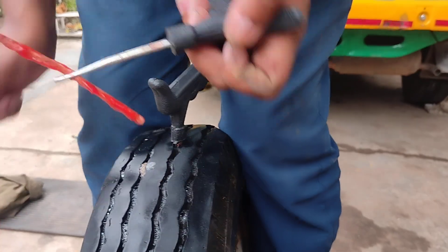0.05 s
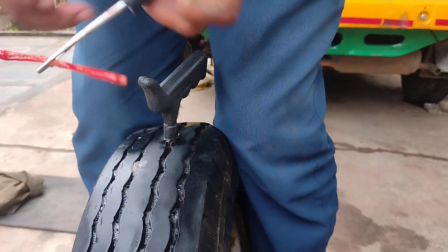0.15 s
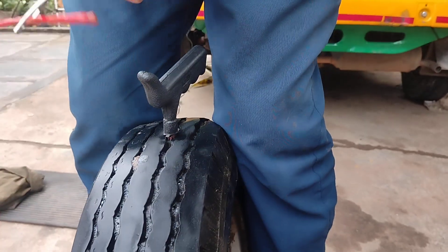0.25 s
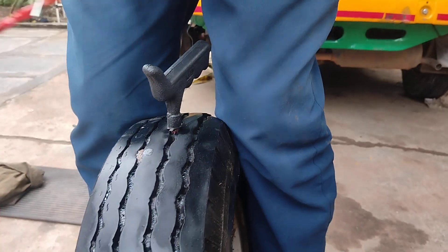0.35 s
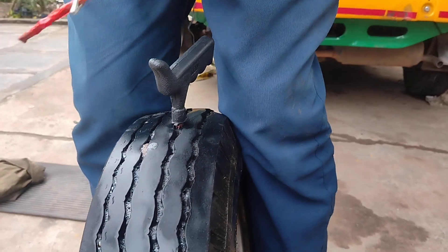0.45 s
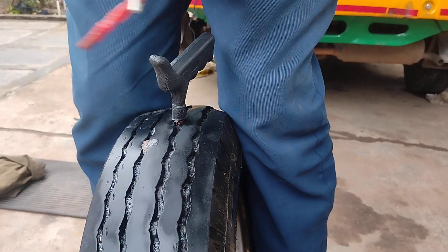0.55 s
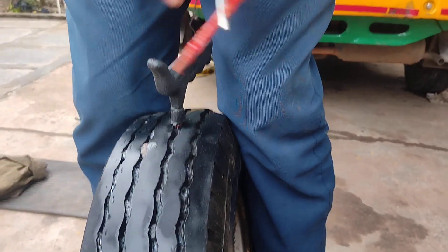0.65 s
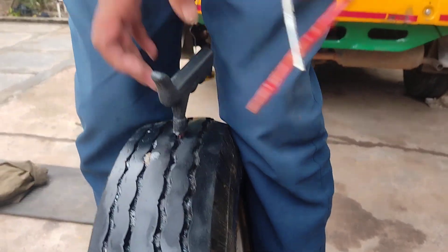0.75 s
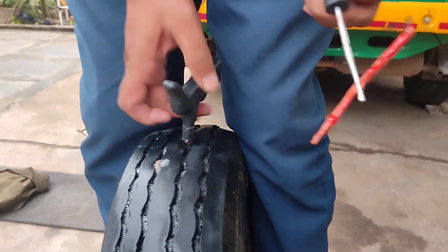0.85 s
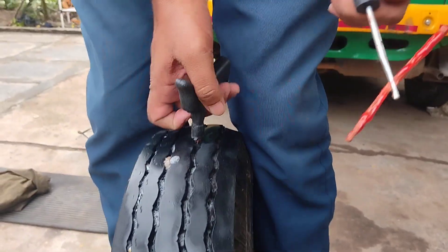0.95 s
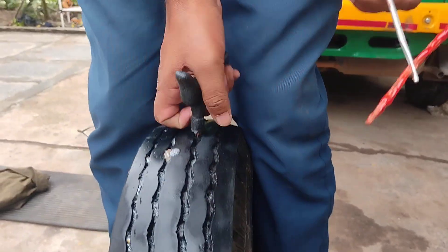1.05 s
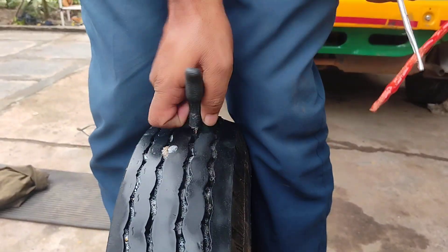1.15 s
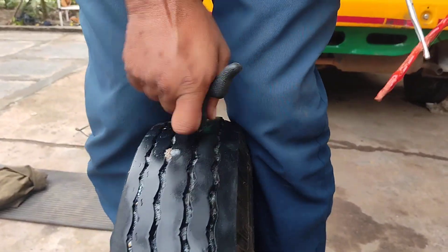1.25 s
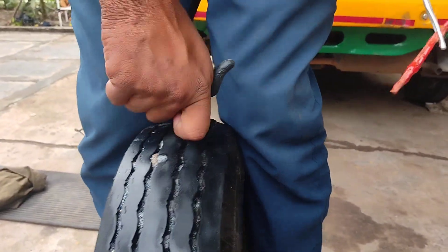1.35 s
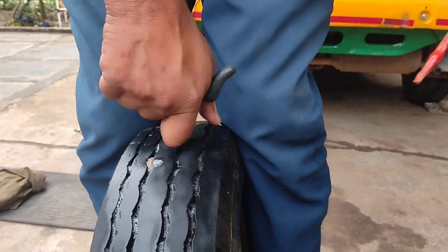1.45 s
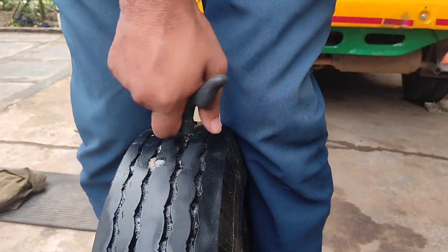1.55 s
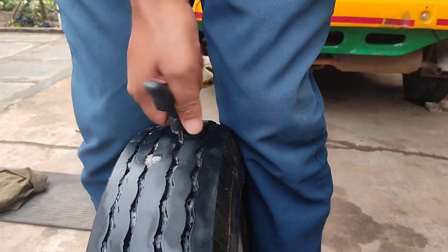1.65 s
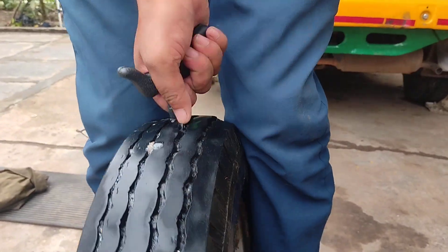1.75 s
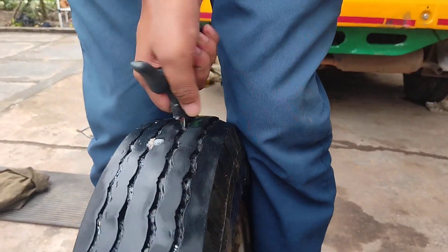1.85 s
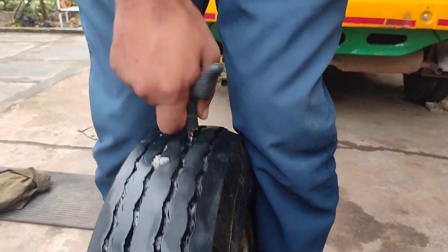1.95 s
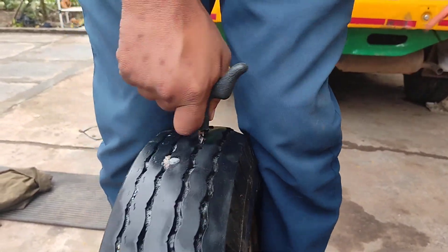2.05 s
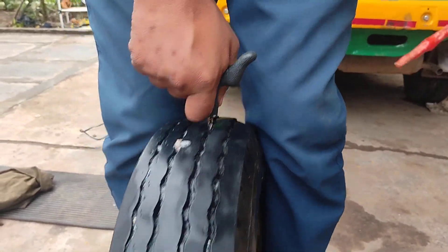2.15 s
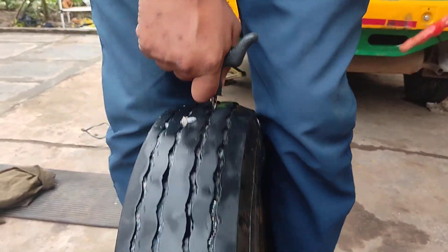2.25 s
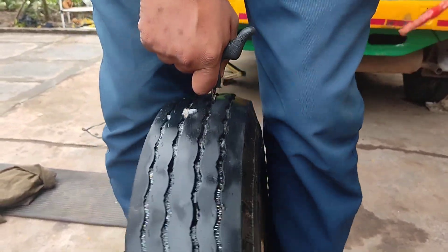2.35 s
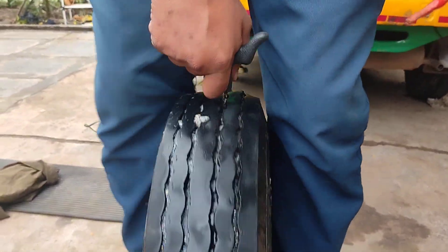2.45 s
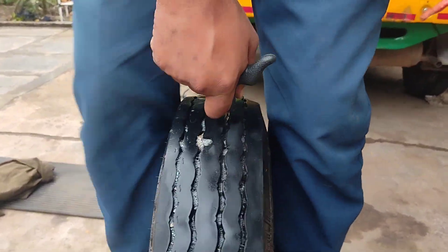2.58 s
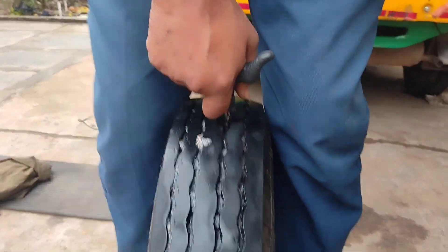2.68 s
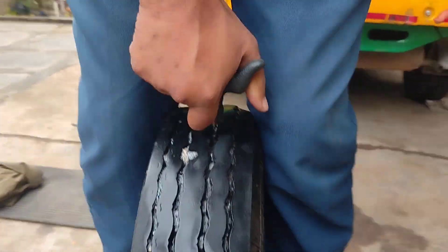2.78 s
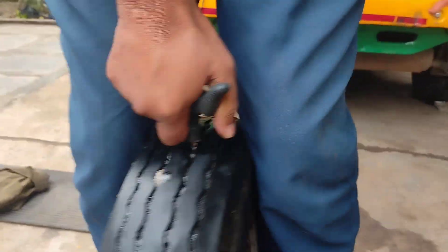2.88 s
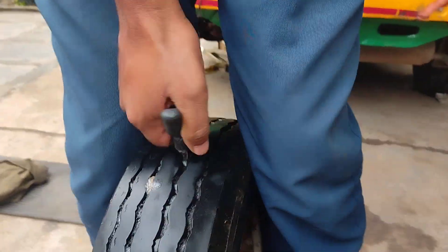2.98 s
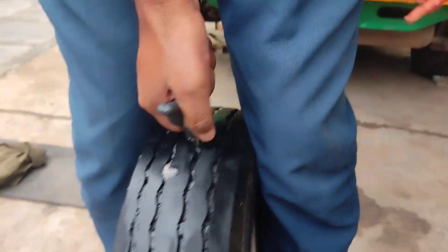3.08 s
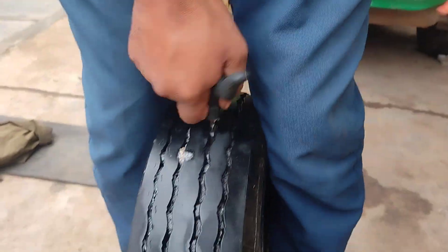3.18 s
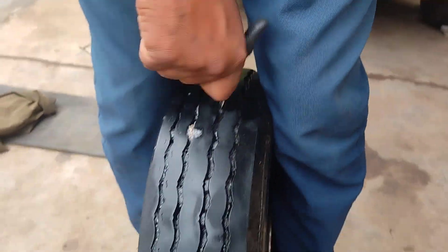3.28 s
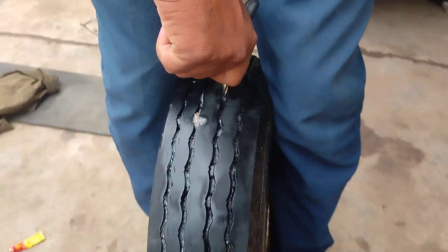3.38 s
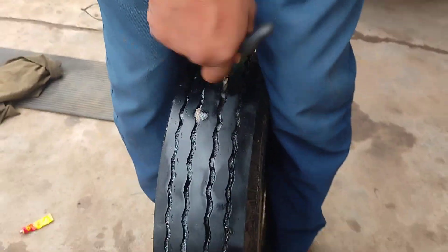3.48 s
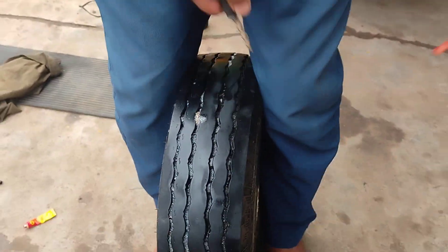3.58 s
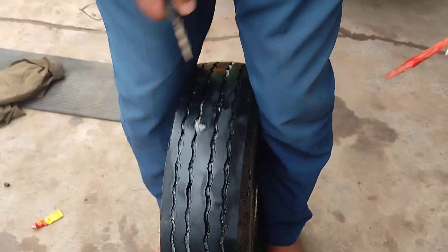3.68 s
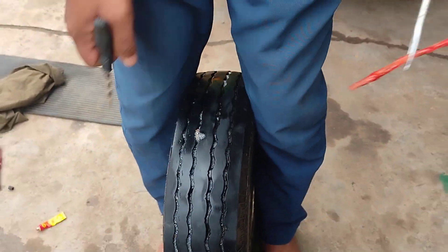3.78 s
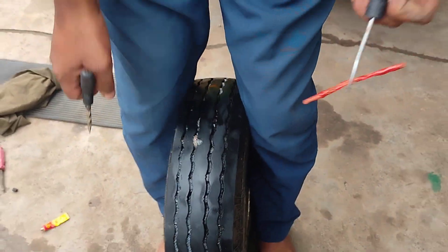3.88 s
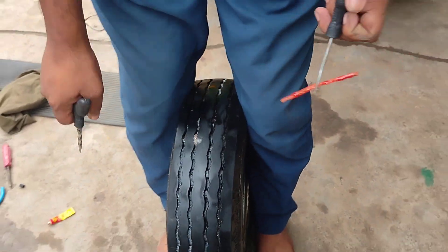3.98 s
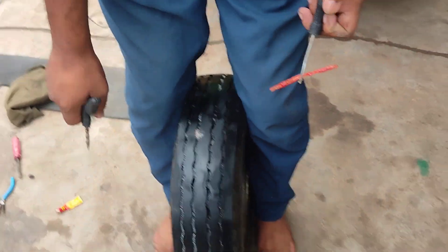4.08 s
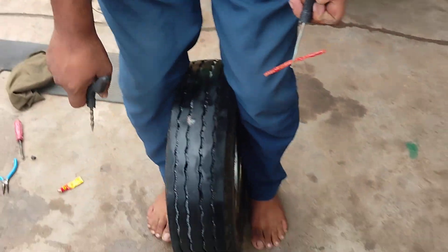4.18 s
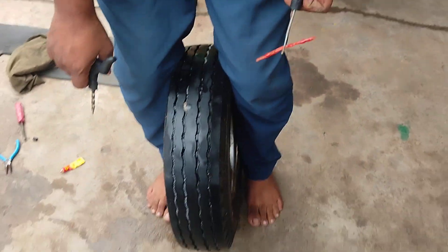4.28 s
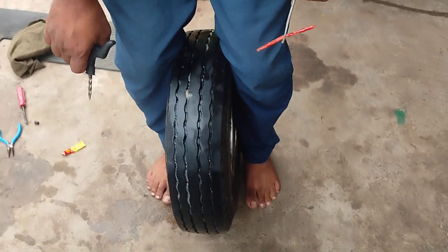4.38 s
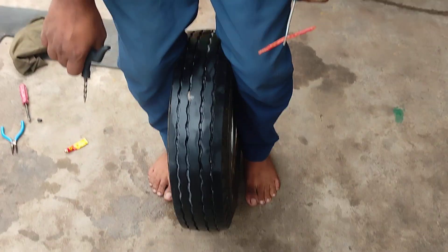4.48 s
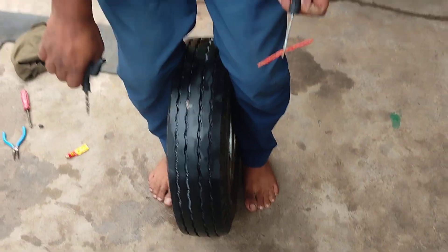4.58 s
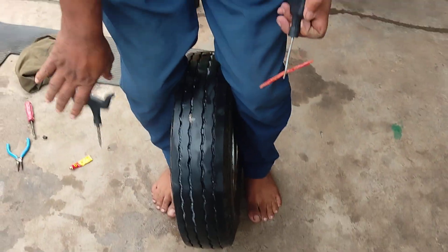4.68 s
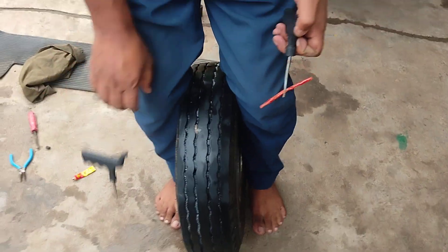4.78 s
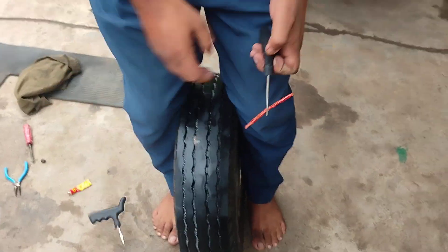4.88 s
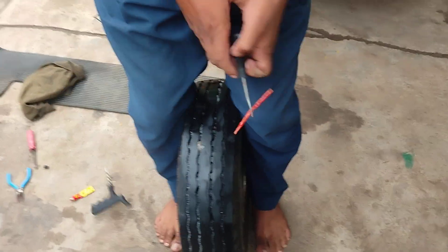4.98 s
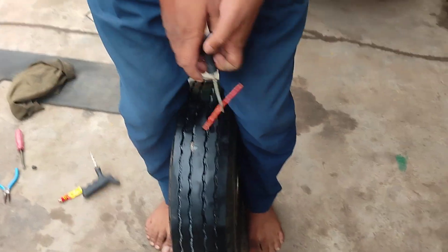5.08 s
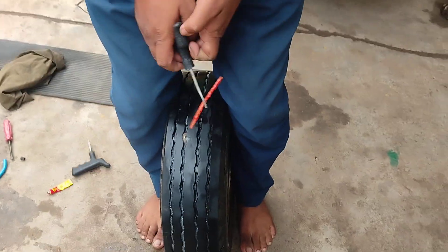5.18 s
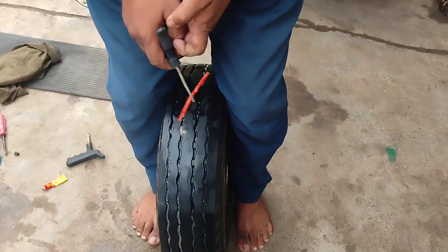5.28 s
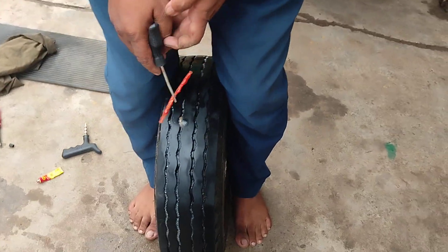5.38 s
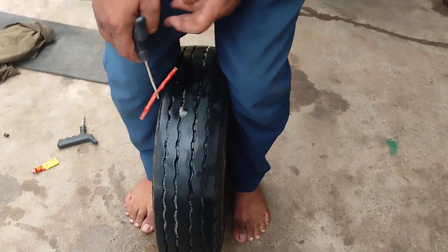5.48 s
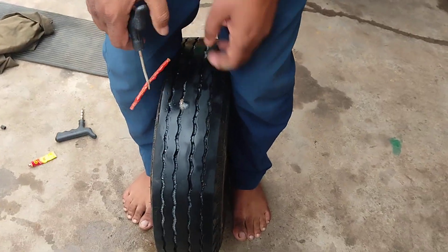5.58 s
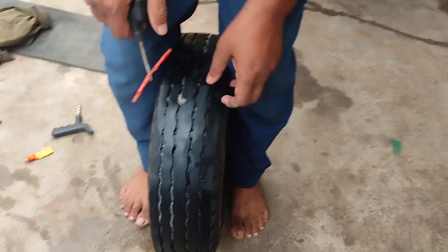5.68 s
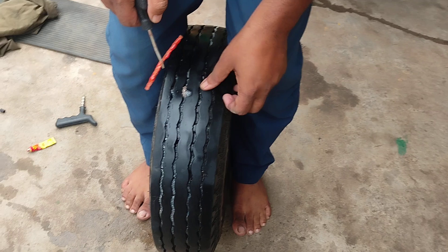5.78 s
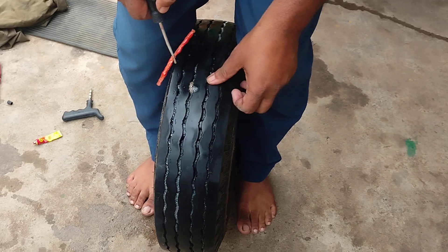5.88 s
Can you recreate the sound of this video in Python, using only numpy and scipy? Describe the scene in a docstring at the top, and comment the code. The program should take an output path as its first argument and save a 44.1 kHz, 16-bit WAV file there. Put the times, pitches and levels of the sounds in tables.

```python
"""Beside a street, close to the microphone: air escapes from a punctured tyre while a reamer works in the hole.
The leak is turbulent hiss: it seeps, squeaks open, surges with each stroke, then blows freely past the reamer.
Gusts and puffs of low noise hit the left port, and a blast of noise marks the reamer popping out.
The dropped reamer clatters on the concrete as cracks, ringing modes and scattered noise.
Behind it lie a traffic rumble, a farther wash and faint gliding tones."""
import sys
import numpy as np
from scipy import signal
from scipy.fft import rfft, irfft
from scipy.io import wavfile
from scipy.ndimage import uniform_filter1d

SR = 44100
rng = np.random.default_rng(int(sys.argv[2]) if len(sys.argv) > 2 else 0)


def bounce(signal):
    """Save signal as a 16-bit WAV file at the path given by the first command-line argument."""
    frames = np.transpose(np.atleast_2d(signal))
    limited = np.clip(frames, -1, 1)
    pcm = np.round(limited * 32767).astype(np.int16)
    wavfile.write(sys.argv[1], SR, pcm)


N = 261513
TIME = np.arange(N) / SR  # seconds
FRAME, HOP = 512, 128  # samples, for shaping the hiss
BINS = np.fft.rfftfreq(FRAME, 1 / SR)  # Hz
FRAMES = np.arange(N // HOP + 5) * HOP / SR  # seconds

# The hand moves the reamer from GRIP_S on, and it leaves the hole at OUT_S; each change takes OPEN_S.
GRIP_S, OUT_S, OPEN_S = 1.222, 3.569, 0.026
# Between strokes a thin leak goes on round the shaft and slowly closes.
GAP_DB, GAP_DB_PER_S, GAP_TREBLE_DB, GAP_THROAT_DB = -35.5, -6, -12, -15
BLOWING_THROAT_DB = -21.5
# Treble (11-16 kHz) and throat (1.8-3.5 kHz) are relative to the hiss (4-16 kHz).
# Air seeping past the resting reamer: time_s, level_db, treble_db, throat_db
SEEPING_CURVE = [(0, -47, 3.5, -5), (.45, -50.5, 0, -1.5), (.75, -50, 0.5, -9), (.94, -45.5, 6, -16),
                 (1.07, -48, 1.5, -10), (1.2, -58, -5, -14)]
# Each stroke opens the gap, holds it and lets it close:
# start_s, length_s, opening_s, closing_s, level_db, swell_db (gained over the stroke), treble_db, throat_db
REAMER_STROKES = [ (1.236, 0.3, 0.049, .147, -20.5, -4.8, -7.5, -14.5),
                  (1.404, 0.32, 0.15, .11, -20, 1.5, -14, -16),
                  (1.712, 0.27, .11, .078, -17.5, -6, -15.5, -19),
                  (2.035, 0.25, 0.046, .024, -35, 3, -10.5, -11.5),
                  (2.217, 0.43, 0.085, 0.26, -31.5, 4, -15.5, -10),
                  (2.502, 0.426, 0.055, 0.022, -43, 3.5, -8, -8.5),
                  (2.932, 0.47, 0.16, 0.18, -23.5, -3, -8.5, -18),
                  (3.359, 0.17, 0.02, 0.12, -38.5, 2, -2, -12), (3.477, .11, .1, 0.045, -21, 2.7, -7, -10)]
# The free jet, as the microphone is lifted and moved about it: time_s, level_db, treble_db
BLOWING_CURVE = [(3.59, -23.5, -10), (3.67, -25.5, -8), (3.82, -23.5, -4.5), (4.1, -26.5, -4.5),
                 (4.52, -24, -1), (5.0, -28.5, -7.5), (5.28, -27, -6), (5.75, -25, -2), (5.93, -27.5, -10)]


def leak():
    """Level, treble and throat of the escaping air: seep, gap, strokes and free jet count by their power."""
    gripped = np.clip((TIME - GRIP_S) / OPEN_S, 0, 1)
    out = np.clip((TIME - OUT_S) / OPEN_S, 0, 1)
    seep_db, seep_treble, seep_throat = at_time(SEEPING_CURVE, TIME)
    free_db, free_treble = at_time(BLOWING_CURVE, TIME)
    gap_db = GAP_DB + GAP_DB_PER_S * (TIME - GRIP_S)
    flows = [((1 - gripped) * amp(seep_db), seep_treble, seep_throat),
             (gripped * (1 - out) * amp(gap_db), GAP_TREBLE_DB, GAP_THROAT_DB),
             (out * amp(free_db), free_treble, BLOWING_THROAT_DB)]
    for start, length, opening, closing, db, swell_db, treble, throat in REAMER_STROKES:
        progress = np.clip((TIME - start) / length, 0, 1)
        gain = held(start, length, opening, closing) * amp(db + swell_db * progress)
        flows.append((gain, treble, throat))
    power = sum(gain ** 2 for gain, _, _ in flows)
    treble_db = sum(gain ** 2 * treble for gain, treble, _ in flows) / power
    throat_db = sum(gain ** 2 * throat for gain, _, throat in flows) / power
    return np.sqrt(power), treble_db, throat_db


# Starting colours of the jet: seeping, forced past the shaft, half blocked, hole free.
# Each one: freq_hz, level_db (per Hz)
SEEP_COLOUR = [(700, -35), (1200, -13.5), (1650, -9), (2150, -6), (3000, -8), (4000, -14), (5800, -9.5),
               (7700, 2), (9000, -2), (9900, -15), (13000, -13), (14200, 3.5), (15100, 6), (16000, -1.5)]
FORCED_COLOUR = [(700, -23.5), (1170, -15.5), (1900, -19.5), (2300, -11), (2700, -7.5), (3150, -11),
                 (3840, -10.5), (4730, -9.5), (7490, -2.5), (8900, -4.5), (9800, -10.5), (11400, -12.5),
                 (13100, -12), (15000, -9.5), (16000, -8.5)]
BLOCKED_COLOUR = [(680, -22.5), (1150, -6), (1600, -12.5), (2000, -12.5), (2280, -5.5), (2650, -4),
                  (3100, -6.5), (3780, -6), (5050, -4.5), (6920, 0.5), (9500, -1), (10500, 0), (12800, -7),
                  (15000, -2.5), (16000, -6)]
FREE_COLOUR = [(700, -31.5), (1100, -22.5), (1600, -23), (2600, -16.5), (3400, -15), (4800, -11.5),
               (6300, -6.5), (8000, -2.5), (8900, -3.5), (10400, 1), (11500, -0.5), (12900, -4),
               (15000, -2.5), (16000, -3.5)]
# State of the hole: time_s, state (0 seeping, 1 forced, 2 half blocked, 3 free)
HOLE_STATE = [(1.2, 0), (1.235, 1), (1.95, 1), (2.2, 2), (3.45, 2), (3.62, 3)]
# Sweeping treble dip as the microphone shifts about the jet: time_s, centre_hz, depth_db
TREBLE_DIP = [(0, 12800, 3), (2.8, 13000, 4), (3.6, 12800, 1), (4.6, 12900, 1), (5.0, 14200, 7),
              (5.38, 14400, 9), (5.55, 12800, 10), (5.72, 11400, 7), (5.93, 11000, 6)]
# Narrow hollow in the upper part of the throat band, higher once the microphone is lifted: time_s, centre_hz
THROAT_HOLLOW = [(2.45, 2910), (2.7, 3400), (3.4, 3300), (4.6, 3400)]


def jet_colour(treble_db, throat_db, dip_width_hz=560, bump_db=3, hollow_db=6, hollow_width_hz=170):
    """The spectrum follows the hole: half blocked it sounds throaty, the free jet is mostly high hiss."""
    t = FRAMES[:, None]
    state = np.clip(at_time(HOLE_STATE, t)[0], 0, 3)
    colours = [SEEP_COLOUR, FORCED_COLOUR, BLOCKED_COLOUR, FREE_COLOUR]
    # crossfade between neighbouring states
    db = sum(np.maximum(1 - abs(state - k), 0) * at_hz(colour, BINS) for k, colour in enumerate(colours))
    # interference: a dip with a crest below it
    dip_hz, depth_db = at_time(TREBLE_DIP, t)
    crest_db = bump_db * depth_db / np.max(depth_db)
    db = db - depth_db * np.exp(-((BINS - dip_hz) / dip_width_hz) ** 2)
    db = db + crest_db * np.exp(-((BINS - 0.79 * dip_hz) / 1300) ** 2)
    hollow_hz = at_time(THROAT_HOLLOW, t)[0]
    db = db - hollow_db * np.exp(-((BINS - hollow_hz) / hollow_width_hz) ** 2)
    # steer treble and throat towards their balance with the hiss
    hiss = band_db(amp(db), 4000, 16000)
    top = band_db(amp(db), 11000, 16000)
    throat = band_db(amp(db), 1800, 3500)
    treble_lift = np.interp(t, TIME, treble_db) - top + hiss
    throat_lift = np.interp(t, TIME, throat_db) - throat + hiss
    db = db + treble_lift * at_hz([(8000, 0.12), (12000, 1.0)], BINS)
    db = db + throat_lift * at_hz([(3000, 0.87), (5500, 0.13)], BINS)
    return amp(db - band_db(amp(db), 4000, 16000))


def band_db(field, lo, hi):
    """Level of one band in each frame of a magnitude field."""
    in_band = (BINS > lo) & (BINS < hi)
    return 10 * np.log10((field[:, in_band] ** 2).sum(1, keepdims=True))


# Short paths by way of hand, tyre and knees: delay_s, strength (gain)
SHORT_PATHS = [(.00048, .1), (.0011, .14), (.0023, .15), (.0037, .15), (.0056, .14), (.0093, .13)]


def nearby(x, drift_s=.00007, drift_hz=.9):
    """Short echoes, drifting as hand and microphone move, comb the hiss."""
    out = x.copy()
    coarse = TIME[::64]
    for delay, strength in SHORT_PATHS:
        # three slow sines of unrelated rates, random in phase
        phases = 2 * np.pi * (drift_hz * np.outer([.37, .61, 1], coarse) + rng.random((3, 1)))
        path = delay + drift_s * np.interp(TIME, coarse, np.sin(phases).sum(0))
        out += strength * x[:, np.round((TIME - path) * SR).astype(int) % N]
    return out


# Left minus right, microphone low by the tyre and then raised above it: freq_hz, difference_db
LOW_TILT = [(800, 5.5), (2800, 2.5), (5000, -1), (8000, -0.5), (9500, 7.5), (10500, 0), (12500, 0),
            (14500, 15), (16000, 11)]
HIGH_TILT = [(800, -3), (2900, 4), (4000, -1.5), (5500, -13.5), (7500, -8), (9000, 0), (10500, 13),
             (12500, 1), (14500, 0), (16000, 2)]
# Left leads right, microphone low and then raised: freq_hz, lead_rad
LOW_LEAD = [(1000, .2), (8500, 0.25), (10000, 1.5), (12000, 1.6), (14500, 3), (16000, 2.8)]
HIGH_LEAD = [(1000, -1.2), (3000, .5), (4200, -7), (5500, -2), (8000, -2), (9500, -6), (11500, -4.5),
             (13500, -10.5), (16000, -14)]
# How far the raised position takes over: time_s, share (0 to 1)
MIC_RAISED = [(1.9, 0.25), (2.4, 0.65), (3.1, 0.85)]
# Left-right likeness of the hiss: freq_hz, likeness (0 to 1)
JET_LIKENESS = [(700, 0.43), (2500, 0.47), (3300, 0.13), (4100, 0.14), (5200, 0.28), (8000, 0.48),
                (16000, 0.27)]


def jet(patchy_db=1.23, flutter_db=0.37, flutter_hz=90, trim_db=1.04):
    """Turbulent hiss: random spectral frames, heard through two ports that each favour other bands."""
    a, b, c, d, patches = rng.standard_normal((5, len(FRAMES), len(BINS)))
    patches = uniform_filter1d(patches, size=8, axis=0)  # over time
    patches = unit(uniform_filter1d(patches, size=12, axis=1))  # over frequency
    raised = np.clip(at_time(MIC_RAISED, FRAMES[:, None])[0], 0, 1)
    tilt_db = (1 - raised) * at_hz(LOW_TILT, BINS) + raised * at_hz(HIGH_TILT, BINS)
    side = amp(tilt_db / 2)
    same = np.clip(at_hz(JET_LIKENESS, BINS), 0, 1)
    low_turn = np.exp(1j * at_hz(LOW_LEAD, BINS))
    high_turn = np.exp(1j * at_hz(HIGH_LEAD, BINS))
    lead = np.angle((1 - raised) * low_turn + raised * high_turn)
    left = a + 1j * b
    right = same * np.exp(-1j * lead) * left + np.sqrt(1 - same ** 2) * (c + 1j * d)
    # even out the mid, so that stereo width leaves the colour alone
    mid = np.sqrt(side ** 2 + side ** -2 + 2 * same * np.cos(lead))
    level, treble_db, throat_db = leak()
    colour = jet_colour(treble_db, throat_db) * amp(patchy_db * patches)
    field = np.array([left * side, right / side]) / mid * colour
    hiss = signal.istft(field.swapaxes(1, 2), nperseg=FRAME, noverlap=FRAME - HOP)[1][:, :N]
    hiss = nearby(hiss)
    return hiss / hiss.mean(0).std() * level * amp(trim_db + flutter_db * waver(flutter_hz))


def squeak(start=1.23, level_db=-29, from_hz=12000, to_hz=9300, length=.013, rough=0.15):
    """The rubber lip first parts from the shaft with a tiny falling whistle, its pitch roughened by noise."""
    u = np.linspace(0, 1, round(length * SR))
    hz = (from_hz + (to_hz - from_hz) * u) * (1 + rough * rng.standard_normal((2, len(u))))
    whistle = np.sin(2 * np.pi * np.cumsum(hz, 1) / SR)
    out = np.zeros((2, N))
    add(out, start, amp(level_db) * 2 * np.sin(np.pi * u) * whistle)
    return out


# The jet sweeps over the microphone, levels before trim: start_s, length_s, level_db
JET_GUSTS = [(1.255, .17, -32), (1.53, .15, -32.5), (1.73, 0.25, -38.5), (3.525, 0.078, -40),
             (3.93, 0.15, -54)]
# Colour of the roar: freq_hz, level_db (per Hz)
GUST_COLOUR = [(35, -34), (60, -1.5), (196, -4), (227, -2.5), (606, -3.5), (1020, -6.5), (1370, -4.5),
               (1950, -7), (5000, -15.5), (6500, -36), (11000, -120)]


def gusts(trim_db=-1, lumpy_db=4, lumpy_hz=130, left_db=15, wake_db=-35, wake_rise=0.022, wake_decay=0.18):
    """The jet grazes the left port and tears into a ragged low roar, which dies away once the reamer is out."""
    level = swells(JET_GUSTS) + amp(wake_db) * burst(OUT_S, wake_rise, wake_decay)
    roar = noise(GUST_COLOUR, 0.12) * pan(left_db) * unit(amp(lumpy_db * waver(lumpy_hz)))
    return roar / roar.mean(0).std() * level * amp(trim_db)


# The shaft leaving the hole: freq_hz, level_db (per Hz)
POP_COLOUR = [(25, -2), (70, 2), (170, -1), (400, -2.5), (650, -7.5), (1100, -1.5), (1700, -6), (3000, -7),
              (5000, -9), (9000, -6), (14000, -11.5)]
# Puffs that press on the left port, levels before panning: start_s, level_db, decay_s
PORT_PUFFS = [(1.3, -32, 0.022), (1.35, -31, 0.035), (1.67, -40.5, 0.074), (1.94, -41, 0.036),
              (2.03, -31, 0.016), (2.16, -38.5, .13), (3.583, -18.5, .014), (3.61, -30, 0.044)]


def pop(start=3.58, level_db=-13, rise=0.0074, decay=0.023, lumpy_db=1.5, left_db=3):
    """The shaft comes free and the full blast hits both ports; puffs thud on the left one."""
    blast_gain = amp(level_db + lumpy_db * waver(150)) * burst(start, rise, decay)
    blast = noise(POP_COLOUR, 0.084) * pan(left_db) * blast_gain
    push = sum(amp(db) * burst(s, 0.0071, fade) for s, db, fade in PORT_PUFFS)
    thud_colour = [(8, 9), (22, 3), (45, -27), (100, -25), (500, -35), (2000, -80)]  # Hz, dB per Hz
    return blast + push * noise(thud_colour, .2) * pan(16.0)


# Knocks of the reamer, peak levels before panning: start_s, level_db, contact_hz, left_minus_right_db
REAMER_KNOCKS = [(2.037, -22, 2540, 2), (3.832, -33, 1500, 15), (4.9515, -11.5, 660, -4.5),
                 (5.0033, -13.5, 1980, -7), (5.034, -33.5, 800, -3), (5.135, -9.5, 5950, 1),
                 (5.173, -12, 4500, 6)]
# Modes of handle and shaft, before a small random sharpening: pitch_hz, level_db, t60_s
REAMER_MODES = [(285, -4, 0.017), (500, -8, 0.022), (1014, 0.5, 0.017), (1220, -3, 0.026),
                (2303, -2.5, 0.072), (2630, -5.5, 0.089), (3080, -2.5, 0.047), (3920, -18, 0.1),
                (5800, -3, 0.031)]


def knocks(ring_db=-13, crack_decay=0.00039, scatter_db=-17, scatter_decay=0.016, breadth=0.9, hollow_hz=1800):
    """Each contact cracks, rings the plastic handle and steel shaft, and scatters off the yard."""
    out = np.zeros((2, N))
    t = np.arange(8192) / SR
    hollow = signal.iirnotch(hollow_hz, 2, fs=SR)  # the gap between the handle's modes and the shaft's
    for s, db, contact_hz, left_db in REAMER_KNOCKS:
        ring = 0
        for mode_hz, mode_db, t60 in REAMER_MODES:
            tone = np.sin(2 * np.pi * mode_hz * rng.uniform(1.0, 1.02) * t)
            ring = ring + amp(mode_db - 60 * t / t60) * tone
        crack = rng.standard_normal(len(t)) + 0.16 * np.sin(2 * np.pi * contact_hz * t)
        crack = crack * np.exp(-t / crack_decay)
        scatter = rng.standard_normal((2, len(t))) * np.exp(-t / scatter_decay)
        # a soft band around the contact pitch
        edges_hz = np.clip(contact_hz * np.exp([-breadth, breadth]), 50, SR / 2 - 1)
        colour = signal.butter(1, edges_hz, "band", fs=SR)
        hit = signal.lfilter(*colour, crack + amp(ring_db) * ring / 2 + amp(scatter_db) * scatter)
        hit = signal.lfilter(*hollow, hit)
        add(out, s, amp(db) * pan(left_db) * hit / abs(hit).max())
    return out


STREET_DB, STREET_DB_PER_S = -48, -0.55
MIDRANGE_DB, MIDRANGE_DB_PER_S = -56, 0.94
# Near rumble and farther traffic: freq_hz, level_db (per Hz)
STREET_COLOUR = [(12, -30), (20, 3), (93, -2), (131, -1), (198, -5.5), (285, -9), (341, -12.5),
                 (409, -17.5), (481, -19), (715, -42), (1060, -34), (1500, -47), (1950, -54), (3300, -120)]
MIDRANGE_COLOUR = [(200, -18), (350, 0.5), (600, -2), (1000, -8), (1600, -13), (3000, -12.5)]
# Brief swells of the rumble, then of the far traffic: start_s, length_s, level_db
RUMBLE_SWELLS = [(.44, 0.16, -44), (1.04, 0.18, -44.5), (2.6, 0.79, -47.5)]
FAR_SWELLS = [(2.4, 0.7, -52), (3.6, 0.38, -54), (5.22, 0.31, -44.5)]


def street(patchy_db=2, restless_db=1.3):
    """Traffic rumble, nearly alike in both ears, and a wavering wash from farther off."""
    rumble_db = STREET_DB + STREET_DB_PER_S * TIME + restless_db * waver(1.3)
    near = np.hypot(amp(rumble_db), swells(RUMBLE_SWELLS))
    far = np.hypot(amp(MIDRANGE_DB + MIDRANGE_DB_PER_S * TIME), swells(FAR_SWELLS))
    rumble = noise(STREET_COLOUR, 0.91) * pan(0.52) * near
    wash = noise(MIDRANGE_COLOUR, 0.47) * far * amp(patchy_db * waver(18))
    return rumble + wash


# Faint far tones: start_s, length_s, from_hz, to_hz, level_db
STREET_TONES = [(3.904, 0.14, 388, 332, -50), (4.016, 0.16, 1105, 1065, -61), (4.432, .12, 441, 327, -58),
                (4.6, 0.094, 1104, 1086, -58), (5.398, 0.11, 900, 945, -56)]


def far_tones():
    """Faint short tones drift in from the street, each a gliding sine that swells and fades."""
    out = np.zeros((2, N))
    for s, length, from_hz, to_hz, db in STREET_TONES:
        hz = np.linspace(from_hz, to_hz, round(length * SR))
        tone = np.sin(2 * np.pi * np.cumsum(hz) / SR)
        add(out, s, amp(db) * pan(0) * 2 * np.hanning(len(hz)) * tone)
    return out


def amp(db):
    """Decibels to gain."""
    return 10 ** (np.asarray(db) / 20)


def unit(x):
    """Scales to rms 1."""
    return x / np.sqrt(np.mean(abs(x) ** 2) + 1e-20)


def at_hz(points, hz):
    """Reads a spectrum on a log-frequency axis."""
    f, value = np.transpose(points)
    return np.interp(np.log(hz + 1), np.log(f + 1), value)


def at_time(rows, t):
    """Reads every column of a curve."""
    s, *columns = np.transpose(rows)
    return [np.interp(t, s, c) for c in columns]


def add(mix, s, sound):
    """Mixes a stereo sound in at time s."""
    part = mix[:, round(s * SR):][:, :sound.shape[1]]
    part += sound[:, :part.shape[1]]


def pan(db):
    """Gains of both channels for a left-right difference."""
    return amp([[db / 2], [-db / 2]])


def waver(hz):
    """Random wandering of rms 1, rolled off above the given rate."""
    rolloff = 1 + (np.fft.rfftfreq(N, 1 / SR) / hz) ** 4
    return unit(irfft(rfft(rng.standard_normal(N)) / rolloff, N))


def noise(spectrum, same):
    """Coloured stereo noise of the given left-right likeness, whose mid has rms 1."""
    gain = amp(at_hz(spectrum, np.fft.rfftfreq(N, 1 / SR)))
    a, b = irfft(rfft(rng.standard_normal((2, N))) * gain, N)
    same = np.clip(same, -1, 1)
    pair = np.array([a, same * a + np.sqrt(1 - same ** 2) * b])
    return pair / pair.mean(0).std()


def burst(s, rise, decay):
    """A quick swell that dies away."""
    age = np.maximum(TIME - s, 0)
    return (1 - np.exp(-age / rise)) * np.exp(-age / decay)


def held(start, length, rise, fall):
    """A smooth attack, a hold at 1 where time allows, and a smooth release."""
    up = np.clip((TIME - start) / rise, 0, 1)
    down = np.clip((start + length - TIME) / fall, 0, 1)
    return (np.sin(np.pi / 2 * up) * np.sin(np.pi / 2 * down)) ** 2


def swells(rows):
    """Rounded swells, each peaking halfway."""
    return sum(amp(db) * held(start, length, length / 2, length / 2) for start, length, db in rows)


def scene():
    """The leak, the tool and the street."""
    return jet() + squeak() + gusts() + pop() + knocks() + street() + far_tones()


def record(dry, edge_hz=15850):
    """A steep low-pass takes off the very top."""
    lowpass = signal.firwin(511, edge_hz, window=("kaiser", 9), fs=SR)
    return signal.oaconvolve(dry, lowpass[None], "same")


dry = scene()
out = record(dry)
bounce(out)
```